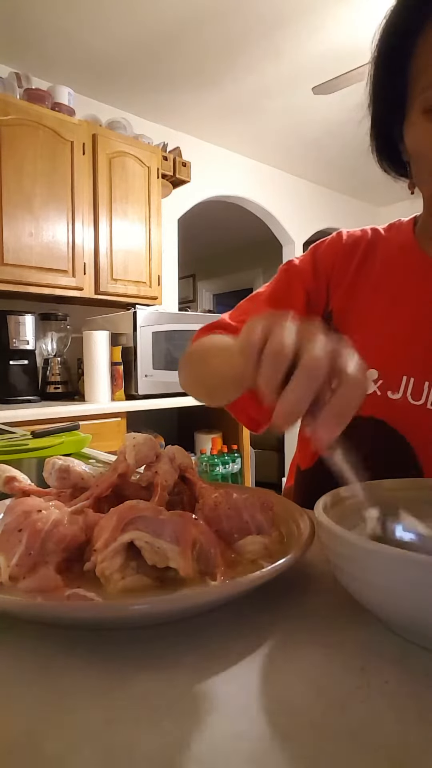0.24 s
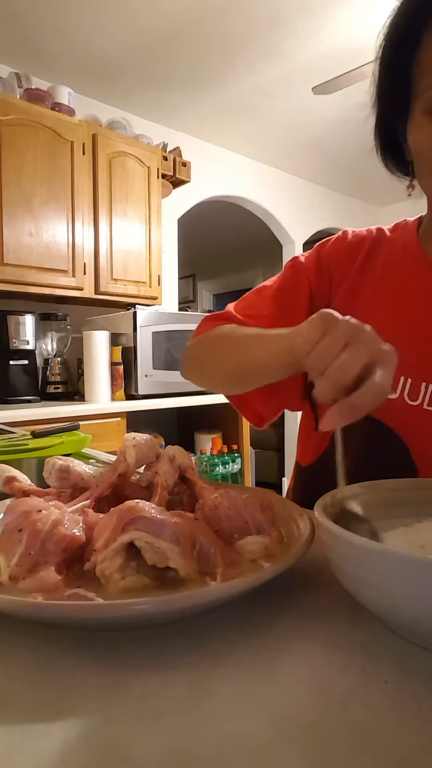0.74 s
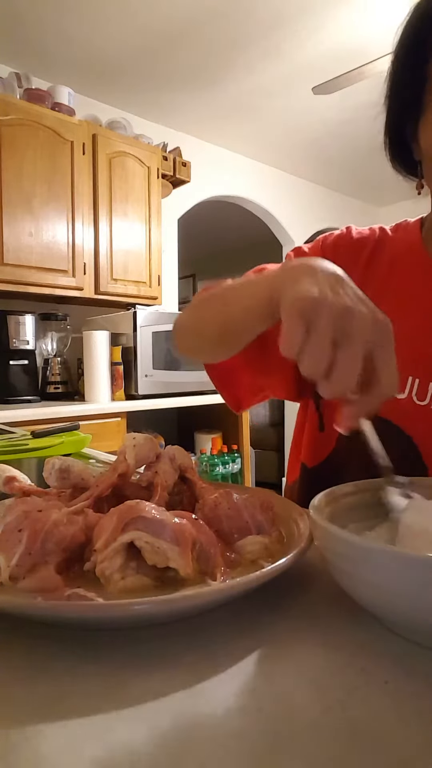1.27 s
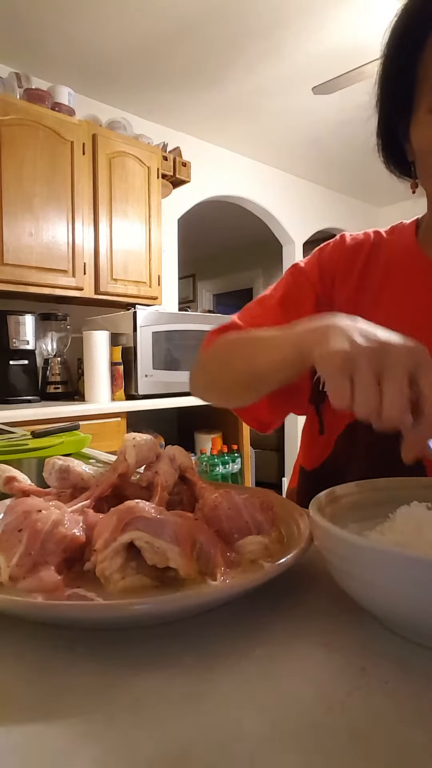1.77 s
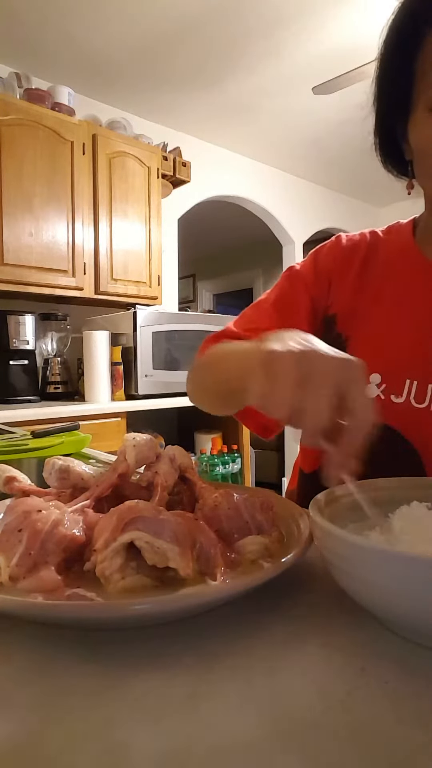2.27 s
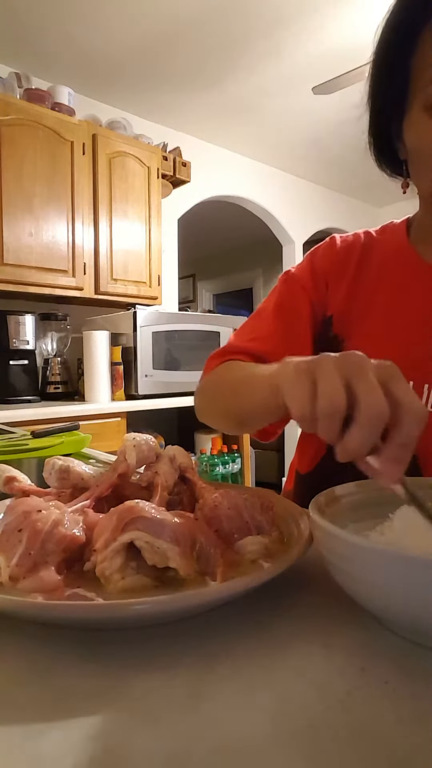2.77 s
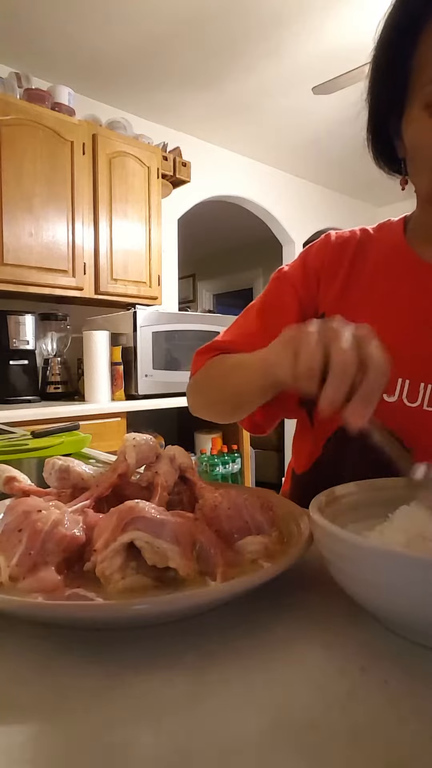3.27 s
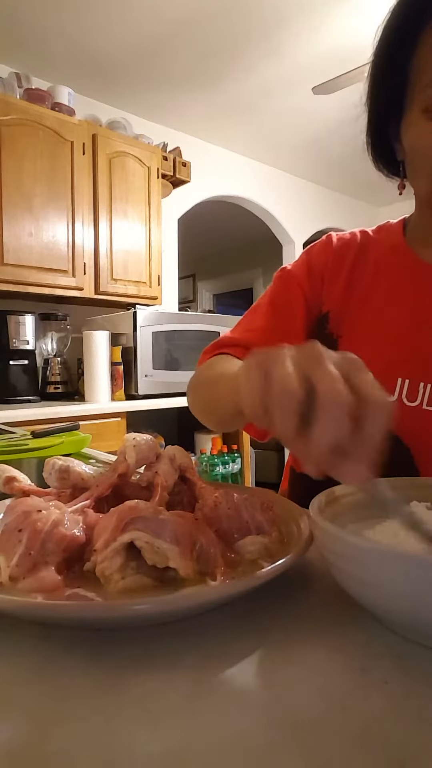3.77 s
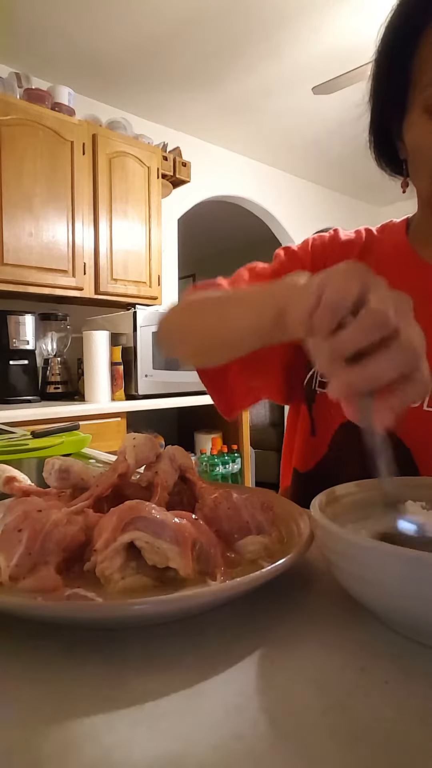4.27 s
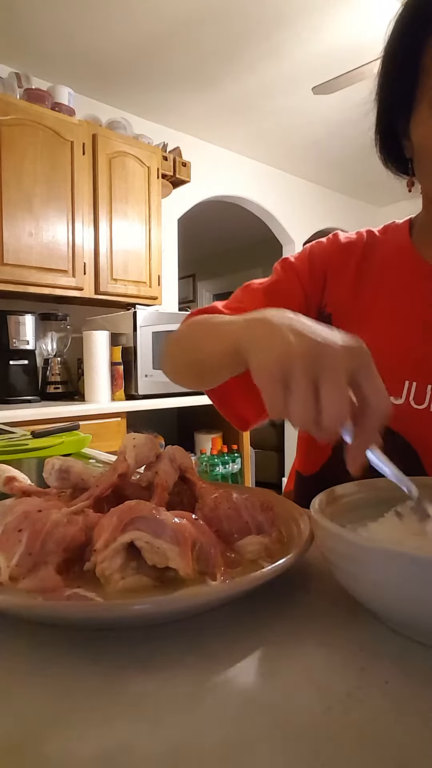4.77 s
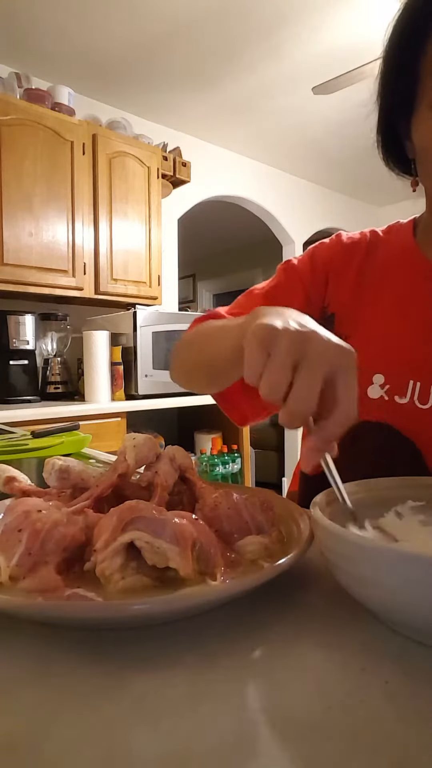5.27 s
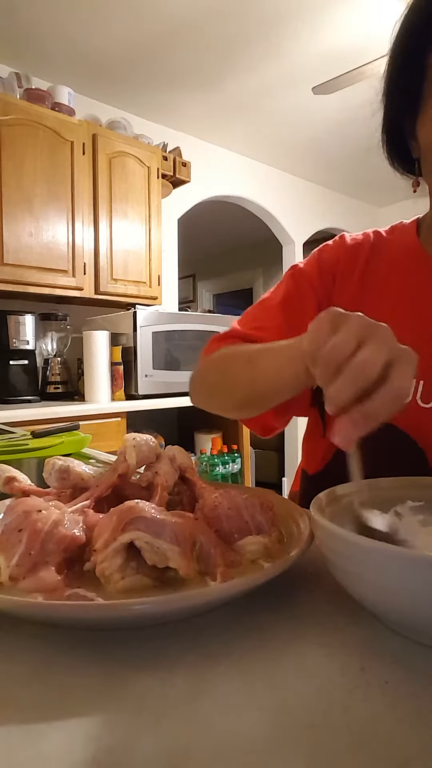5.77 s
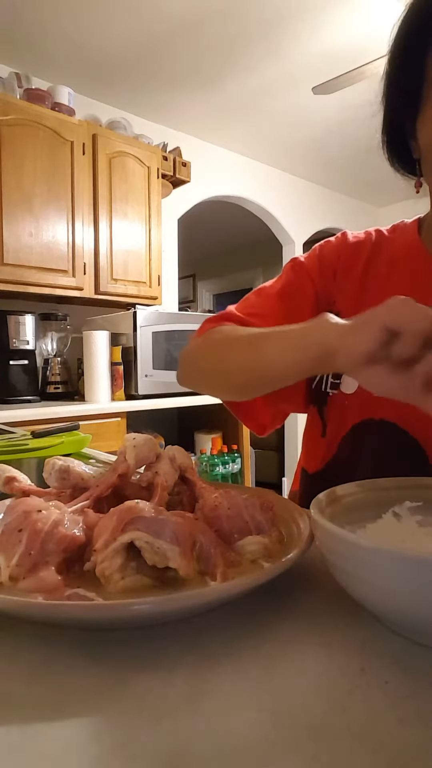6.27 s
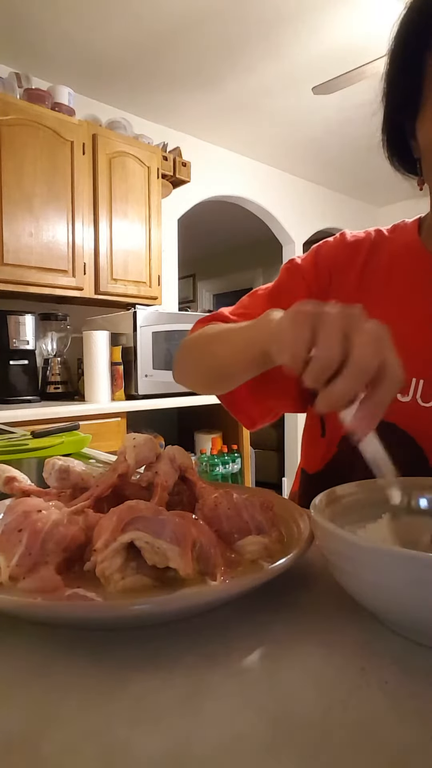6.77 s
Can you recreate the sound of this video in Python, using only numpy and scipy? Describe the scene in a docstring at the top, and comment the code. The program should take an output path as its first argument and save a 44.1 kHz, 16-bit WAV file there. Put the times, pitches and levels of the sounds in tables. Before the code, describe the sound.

A metal spoon stirs dry powder in a ceramic bowl, scraping softly in uneven sweeps with short dull clinks in a quiet kitchen.

```python
"""On a kitchen counter, just right of a stereo microphone pair, a metal spoon stirs dry coating mix in a bowl.
A stroke is band-split friction noise: rumble, scrape and grit, coloured by resonances of spoon and bowl.
Knocks through the powder are damped sines with a noise burst and a faint, brief ring of the ceramic wall;
clinks ring it more. Slips make the wall skid and creak. The packed bowl rings only briefly.
A small kitchen answers with noise echoes, over moving air and a faint appliance hum.
"""
import sys
import numpy as np
from scipy import signal
from scipy.fft import rfft, irfft, next_fast_len
from scipy.io import wavfile
from scipy.ndimage import uniform_filter1d, map_coordinates

SR = 44100
rng = np.random.default_rng(int(sys.argv[2]) if len(sys.argv) > 2 else 0)


def generate_wav(signal):
    """Clip the signal to [-1, 1] and save it as 16-bit WAV at the path in sys.argv[1]."""
    frames = np.transpose(np.atleast_2d(signal))
    scaled = np.clip(frames, -1, 1) * 32767
    pcm = np.round(scaled).astype(np.int16)
    wavfile.write(sys.argv[1], SR, pcm)


N = 310464

# Room tone of moving air. Each row: frequency in Hz, relative level in dB.
AIR = [(20, -38.5), (58, -3), (85, -9), (150, -0.5), (320, -7), (600, -15.5), (3000, -30), (16000, -52)]
# Likeness of the two channels of the air. Each row: frequency in Hz, left-right likeness from 0 to 1.
AIR_ALIKE = [(240, 0.986), (3500, 0)]
HUM_HZ, HUM_DB = 240.5, -57  # the appliance hum; its level wavers about this value
# Decay of the room. Each row: frequency in Hz, t60 in seconds.
KITCHEN_T60 = [(2000, 0.4), (14000, 0.023)]

# Direction of the bowl. Each row: frequency in Hz, left-right difference in dB (positive is left).
BALANCE = [(200, -2), (660, -11), (880, -5.5), (2600, -3), (3600, -9), (12000, -1)]
# Likeness of the two channels of a near noise. Each row: frequency in Hz, left-right likeness from 0 to 1.
NEAR_ALIKE = [(300, 1), (6000, 0.54)]
# The nearer microphone leads. Each row: frequency in Hz, phase in radians by which left lags.
LAG = [(220, 0), (500, 0.984), (1600, 0.88), (2400, 1)]

# Packed powder creaks under the spoon.
# Each row: centre in seconds, half length in seconds, mean pitch in Hz, level in dB.
CREAKS = [(0.016, 0.0336, 2659, -40), (0.856, 0.0412, 1154, -33.5), (0.88, 0.0127, 1424, -34),
          (1.413, 0.0165, 440, -35), (2.798, 0.0324, 2620, -40), (4.395, 0.0985, 440, -42)]
# The spoon's edge chatters on bare glaze.
# Each row: centre in seconds, half length in seconds, frequency driven most in Hz, drive in dB.
SKIDS = [(0.058, 0.0291, 5730, -39), (0.83, 0.0102, 3225, -37.5), (1.257, 0.0164, 5650, -24.5),
         (1.294, 0.00953, 2980, -21.5), (1.297, 0.0054, 8540, -19), (3.978, 0.0044, 3225, -38.5),
         (4.23, 0.00277, 8260, -19), (4.55, 0.0094, 6100, -23.5)]

# Wall modes of the bowl.
# Each row: frequency in Hz, relative level in dB, free t60 in seconds, left-right difference in dB.
WALL_MODES = [(1316, 1, .155, -6), (3225, 0, .19, -8), (5652, -5.5, .135, -10), (8538, -5.5, .125, -6),
              (10760, -13, .08, 0), (11836, -5.5, .13, 1), (12778, -7, .12, 4), (15475, -10, .12, 1)]
# The whole bowl rocking on the counter.
# Each row: mean frequency in Hz, relative level in dB, free t60 in seconds.
ROCKING_MODES = [(446.1, -9, 0.1292), (597.5, -8.5, 0.044), (281.3, -19.5, 0.234)]
# The spoon strikes bare wall. Each row: start in seconds, thump in Hz, knock in dB, low ring in dB,
# high ring in dB, treble in dB, lengths of the low and of the high ring as shares of the free ring.
# All levels are relative.
CLINKS = [(0.3446, 484.3, -9.5, -19, -22.5, -20.5, 1.454, 1.622),
          (0.38, 427, -10.5, -31.5, -24.5, -57.5, 0.644, 0.5),
          (0.719, 465.3, -4, -14, -20.5, -17, 0.581, 0.154),
          (1.119, 503, -13.5, -13.5, -18.5, -30.5, 1.207, 1.064),
          (1.194, 438, -29.5, -20, -33.5, -37, 0.864, 1.42),
          (2.179, 402, -16.5, -15.5, -14, -14, 1.5, 1.597),
          (3.09, 466.4, -8.5, -21.5, -21.5, -20, 1.36, 0.89),
          (3.157, 436.2, -12.5, -25.5, -34, -55.5, 0.69, 0.8),
          (3.494, 558, -9.5, -19, -22.5, -38.5, 0.278, 1.27),
          (4.2166, 426.3, -10.5, -13.5, -25, -31.5, 1.014, 1.64),
          (5.7614, 454.4, -11.5, -17.5, -24, -22.5, 0.565, 0.595),
          (7.025, 407, -11.5, -15.5, -27.5, -23, 1.75, 1.67)]
# Duller blows through a cushion of powder: the wall rings only briefly and faintly.
# Each row: start in seconds, thump in Hz, then knock, burst and treble in relative dB.
THUDS = [(0.114, 553, -17.5, -25.5, -72.5), (1.4333, 408, -29, -21, -40), (1.831, 322, -27.5, -30.5, -48),
         (1.94, 464, -23.5, -22.5, -56), (2.227, 586, -16, -13, -23.5), (2.248, 465, -19, -17.5, -38.5),
         (2.728, 410, -17.5, -46, -57.5), (2.8926, 430.6, -20, -18, -65), (3.819, 427, -6, -18, -49.5),
         (4.025, 586, -25.5, -37, -59.5), (4.776, 693, -39, -18, -48), (5.066, 444, -26.5, -42.5, -46.5),
         (6.317, 494.6, -27, -27.5, -43.5), (6.637, 418, -7.5, -14, -36.5)]
THUD_LENGTH, THUD_RING_DB = 0.418, -18.5  # share of the free ring; lowest wall mode relative to the burst
# Dull burst of a blow. Each row: frequency in Hz, relative level in dB.
BURST_COLOUR = [(100, -23.5), (300, 5.5), (700, 10), (1500, 10), (2300, -6), (16000, -43)]
# Steel on glaze. Each row: frequency in Hz, relative level in dB.
TICK_COLOUR = [(1000, -7), (4200, 5), (9500, -1), (10800, 3.5), (14000, -5), (16000, -0.5)]
SNAP_S, SNAP_DB = 0.0001653, 3.5  # the contact itself: one short push and pull, relative to the burst
THUMP_DB, THUMP_T60 = 6, 0.0234  # the main thump: relative level, free t60 in s
# The spoon rattles on the wall and feeds the ring before it settles: time and dB scales.
# The swell peaks at about 0.8 of the time and 0.7 of the dB.
CHATTER_S, CHATTER_DB = 0.02, 4.5
# The spoon falls back on the wall and chokes the ring. Each row: start in seconds, gain in dB.
CHOKES = [(2.196, -7)]

# Sweeps through the mix. Each row: landing in seconds, length in seconds, then rumble, scrape and grit
# in dB before push and easing, centre of the push as a share of the length, push in dB (negative dips).
STROKES = [(0, 0.0979, -42, -47.5, -49, 0, 7.5), (0.343, 0.1486, -59, -46.5, -50.5, 0, -1.5),
           (0.713, 0.1915, -43.5, -46, -48.5, 0.78, 2), (1.018, 0.114, -46, -51.5, -66.5, 0.68, 10),
           (1.118, 0.3856, -45, -50.5, -51.5, 0.44, 7), (1.829, 0.103, -50, -45, -52, 0.2, 6.5),
           (2.175, 0.2742, -55.5, -46.5, -57.5, 0.56, 8.5), (2.728, 0.1811, -43.5, -47, -50.5, 0.69, 4),
           (3.09, 0.1876, -45, -48.5, -51.5, 0, -4), (3.491, 0.0897, -39, -44, -54.5, 0.09, 5),
           (3.821, 0.188, -49.5, -48, -55, 0.63, 14), (4.218, 0.5545, -49.5, -47.5, -52, 0.62, 11),
           (5.061, 0.4802, -57.5, -53.5, -59.5, 0.71, 12), (5.786, 0.289, -43.5, -53.5, -60.5, 0.63, 11.5),
           (6.31, 0.1148, -43, -54, -60.5, 0, 7), (6.633, 0.2, -48, -53, -55, 0.75, 8)]
PUSH_S, PUSH_SHARE = 0.019, 0.142  # half length of the push in s, plus a share of the sweep's length
# How far each band follows the push: shares for rumble, scrape and grit.
PUSH_GROWS = [0.51, 1, 0.8]
EASE_DB = 2.5  # fall of the drag from landing to lift
BITE_S, SETTLE_S = 0.0022, 0.005  # the spoon bites at once; the powder settles after it lifts
# The spoon catches on a lump and breaks it. Each row: start in seconds, level in dB.
CATCHES = [(0.824, -41.5), (2.32, -41), (4.522, -35), (4.564, -34)]
CATCH_S = 0.012  # time constant by which a catch dies
# Balance of a catch: rumble, scrape and grit in relative dB.
CATCH_DB = [-17.5, 1.5, -5.5]
# Hiss of the powder. Each row: frequency in Hz, relative level in dB.
POWDER = [(60, -10.5), (240, 3.5), (780, 1.5), (1250, -3.5), (2050, -13.5), (7000, -19.5), (9600, -22.5),
          (11000, -15), (16000, -21.5)]
# Resonances of spoon and bowl while they rub. Each row: frequency in Hz, width in Hz, relative level in dB.
RUB_RESONANCES = [(435.15, 70, 10), (1081.3, 150, 13), (1615.2, 360, 13), (2652.5, 434, 17.5),
                  (3325, 200, 16), (4436, 640, 10), (5672, 460, 10), (8297, 1100, 8)]
DRIFT, DRIFT_PER_S = 0.012, 35  # the contact travels: share of pitch, random knots a second

TOP_HZ = 15900  # band limit


def amp(db):
    """Logarithmic level: decibels become a gain."""
    return np.exp(np.asarray(db) * (np.log(10) / 20))


def unit(x):
    """Normalization of power: scale to rms 1."""
    return x / np.sqrt(np.mean(x ** 2) + 1e-20)


def along(points, hz):
    """Interpolation on a logarithmic frequency axis through (Hz, value) points."""
    f, v = np.transpose(points)
    return np.interp(np.log(hz + 1), np.log(f + 1), v)


def wobble(rate, size=N):
    """Band-limited random modulation: a smooth curve through normal draws, rate knots a second."""
    knots = rng.standard_normal(int(size * rate / SR) + 4)
    return map_coordinates(knots, [np.arange(size) * rate / SR])


def swell(s, half):
    """Gaussian envelope: a bell-shaped gain around time s."""
    return np.exp(-((np.arange(N) / SR - s) / half) ** 2)


def filtered(x, response):
    """Linear filtering: the spectrum of x times a response of frequency."""
    size = x.shape[-1]
    m = next_fast_len(size + 8192)
    return irfft(rfft(x, m) * response(np.fft.rfftfreq(m, 1 / SR)), m)[..., :size]


def pan(db):
    """Level difference between channels: left and right gains whose mean is 1."""
    g = amp(np.array([[.5], [-.5]]) * db)
    return g / g.mean(0)


def placed(pair, colour, alike=NEAR_ALIKE, balance=BALANCE):
    """Interchannel coherence: two unrelated noises become a coloured stereo sound with a mid of rms 1."""
    m = next_fast_len(N)
    hz = np.fft.rfftfreq(m, 1 / SR)
    turn = np.arccos(np.clip(along(alike, hz), -1, 1)) / 2
    mid, side = rfft(pair, m) * colour(hz) * np.array([np.cos(turn), np.sin(turn)])
    stereo = np.array([mid + side, mid - side]) * pan(along(balance, hz))
    return irfft(stereo, m)[:, :N] / irfft(mid, m).std()


def add(track, s, sound):
    """Superposition: mix a sound in at time s."""
    part = track[:, round(s * SR):][:, :sound.shape[1]]
    part += sound[:, :part.shape[1]]


def room_tone(air_db=-53):
    """Broadband and tonal background: coloured noise of moving air and a slightly unsteady appliance hum."""
    air = placed(rng.standard_normal((2, N)), lambda hz: amp(along(AIR, hz)), AIR_ALIKE,
                 [(100, 0.5), (1000, -2)])  # direction: Hz, left-right dB
    phase = 2 * np.pi * HUM_HZ * np.arange(N) / SR + .5 * wobble(20.0)
    hum = amp(HUM_DB + 4.16 * wobble(3.69)) * np.sin(phase)
    return amp(air_db) * air + hum


def kitchen(x, early_db=-13, early_t60=0.291, tail_db=-21):
    """Reverberation: sparse reflections from counter and cupboards, and a faint diffuse room tail."""
    hz, t, z = signal.stft(rng.standard_normal((2, SR // 2)), SR, nperseg=256)
    decay = amp(-60 * t / along(KITCHEN_T60, hz)[:, None])
    tail = signal.istft(z * decay, SR, nperseg=256)[1]
    reflections = rng.standard_normal(tail.shape) * (rng.random(tail.shape) < .03)
    early = reflections * amp(-60 * np.arange(tail.shape[1]) / SR / early_t60)
    answer = amp(tail_db) * tail / np.linalg.norm(tail[0]) + amp(early_db) * early / np.linalg.norm(early[0])
    delayed = np.pad(answer, ((0, 0), (130, 0)))  # samples, about 3 ms
    return signal.fftconvolve(x, delayed, axes=1)[:, :N]


def creaks(slips_per_s=190, ring_s=0.0085, wander_hz=55):
    """Stick-slip: uneven slips ring one resonance of spoon or bowl, whose pitch wanders with pressure."""
    out = np.zeros(N)
    for s, half, hz, db in CREAKS:
        slip_rate = slips_per_s * np.exp(.5 * wobble(slips_per_s))
        slips = np.diff(np.floor(np.cumsum(slip_rate) / SR), prepend=0)
        kicks = slips * np.exp(2j * np.pi * rng.random(N))
        ring = signal.lfilter([1], [1, -np.exp(-1 / (ring_s * SR))], kicks)
        turns = np.cumsum(hz + wander_hz * wobble(60)) / SR
        out += amp(db) * swell(s, half) * unit(np.real(ring * np.exp(2j * np.pi * turns)))
    return filtered(out, lambda hz: pan(along(BALANCE, hz)))


def skids(below_db_per_octave=6, above_db_per_octave=17):
    """Forced resonance: irregular slips drive the wall modes, most those near the slips' own pitch."""
    slips, out = rng.standard_normal(N), np.zeros((2, N))
    drives = [(swell(s, half), pitch, db) for s, half, pitch, db in SKIDS]
    loss_db = lambda octaves: max(-below_db_per_octave * octaves, above_db_per_octave * octaves)
    for hz, mode_db, t60, side_db in WALL_MODES:
        width_hz = np.log(1000) / (np.pi * t60)  # bandwidth that belongs to the decay
        drive = sum(shape * amp(db - loss_db(np.log2(hz / pitch))) for shape, pitch, db in drives)
        singing = signal.lfilter(*signal.iirpeak(hz, hz / width_hz, fs=SR), slips * drive)
        # narrow modes pass less noise power
        out += amp(mode_db) * pan(side_db) * singing * np.sqrt(SR / (3 * np.pi * width_hz))
    return out


def blows():
    """Common form of impacts: clinks and thuds as start, thump Hz, knock, burst, low ring, high ring
    and treble in dB, low and high ring length."""
    clinks = [(s, hz, knock, (knock + low) / 2, low, *rest) for s, hz, knock, low, *rest in CLINKS]
    thuds = [(s, hz, knock, burst, burst + THUD_RING_DB, treble, treble, THUD_LENGTH, THUD_LENGTH)
             for s, hz, knock, burst, treble in THUDS]
    return clinks + thuds


def wall_ring(t, levels_db, lengths, split=.017, twin_db=-7, twin_life=.55, attack=.0007, scatter_db=1,
              after_db=-25, flutter_db=1.5):
    """Mode splitting: in a bowl not quite round each mode has a twin, usually higher, and the two beat."""
    out = np.zeros((2, len(t)))
    chatter = amp(CHATTER_DB * (t / CHATTER_S) / (1 + (t / CHATTER_S) ** 10))
    for (hz, db, t60, side_db), level_db, length in zip(WALL_MODES, levels_db, lengths):
        size, detune, side = rng.standard_normal(3)
        # short waves reach the two microphones out of step
        step = np.array([[.5], [-.5]]) * np.sign(side) * min(hz / 4500, 1.8)
        phase = rng.uniform(0, 2 * np.pi) + step
        fall_db = -60 * t / (t60 * max(length, .05))
        # a faint after-ring outlasts the first quick decay
        main = (amp(fall_db) + amp(after_db + fall_db / 2)) * np.sin(2 * np.pi * hz * t + phase)
        twin_hz = hz * (1 + split * (1 + detune / 2) * np.sqrt(WALL_MODES[0][0] / hz))
        twin = amp(twin_db + fall_db / twin_life) * np.sin(2 * np.pi * twin_hz * t + phase[::-1])
        # the sliding spoon roughens the ring, the higher modes most
        flutter = amp(flutter_db * np.sqrt(hz / WALL_MODES[1][0]) * wobble(110, size=len(t)))
        out += amp(db + level_db + scatter_db * size) * pan(side_db) * (main + twin) * flutter
    return out * chatter * (1 - np.exp(-t / attack))


def choked(s, t):
    """Contact damping: gain of a ring struck at time s, as the spoon falls back on it within 2 ms."""
    return amp(sum(db * np.clip((s + t - at) / .002, 0, 1) for at, db in CHOKES if at > s))


def strikes(knock_gain_db=-1, ring_gain_db=-3.5, burst_gain_db=-7, burst_t60=0.0535,
            tick_db=-4, tick_t60=0.0381, spill_db=-17, spill_t60=0.1, low_cut_hz=170):
    """Impact excitation: each blow rocks the bowl, rings its wall and throws a short burst of powder."""
    out, t = np.zeros((2, N)), np.arange(int(.4 * SR)) / SR
    bursts = placed(rng.standard_normal((2, N)), lambda hz: amp(along(BURST_COLOUR, hz)))
    ticks = placed(rng.standard_normal((2, N)), lambda hz: amp(along(TICK_COLOUR, hz)))
    rise = 1 - np.exp(-(t / 0.0009826) ** 2)
    u = (t - t[np.argmax(rise > .5)]).clip(0) / SNAP_S
    snap_pan = pan(along(BALANCE, 1 / (2 * np.pi * SNAP_S)))
    snap = amp(SNAP_DB) * snap_pan * u * (2 - u) * np.exp(-u)
    hardest_db = max(treble for *_, treble, _, _ in CLINKS)
    for s, thump_hz, knock_db, burst_db, low_db, high_db, treble_db, length, high_length in blows():
        # a spoon that stays pressed on the wall damps it
        held = np.clip(length, .05, 1.5) ** .6
        rocking = [(thump_hz, THUMP_DB, THUMP_T60 * held)]
        rocking += [(hz * rng.normal(1, 0.034), db, t60 * max(length, .05)) for hz, db, t60 in ROCKING_MODES]
        knock = sum(amp(db - 60 * t / t60) * -np.sin(2 * np.pi * hz * t) for hz, db, t60 in rocking)
        start = rng.integers(N - len(t))
        # the less the wall may ring, the more of the blow goes into a short dry burst
        burst_decay = amp(burst_gain_db - 60 * t / (burst_t60 * held)) / np.sqrt(held)
        burst = bursts[:, start:][:, :len(t)] * burst_decay
        tick_decay = amp(tick_db - 60 * t / tick_t60) + amp(spill_db - 60 * t / spill_t60)
        tick = ticks[:, start:][:, :len(t)] * tick_decay
        blow = amp(knock_db + knock_gain_db) * pan(-8.0) * knock + amp(burst_db) * burst + amp(treble_db) * tick
        # only the hardest blows reach the top four modes in full
        top_db = 2 * treble_db - hardest_db
        levels_db = [low_db, high_db] + [treble_db] * 2 + [top_db] * 4
        lengths = [length] + [high_length] * (len(WALL_MODES) - 1)
        ring = wall_ring(t[t < t[-1] * max(length, high_length)], levels_db, lengths)
        add(out, s, rise * blow + amp(burst_db) * snap)
        add(out, s, amp(ring_gain_db) * ring * choked(s, t[:ring.shape[1]]))
    # the blows carry little deep bass
    return signal.sosfilt(signal.butter(2, low_cut_hz, 'high', fs=SR, output='sos'), out)


def drag():
    """Load-dependent friction: rumble, scrape and grit gains of sweeps that bite, swell or dip once
    around one place in their length, ease and lift; lumps jolt them."""
    out, t = np.zeros((3, N)), np.arange(int(.8 * SR)) / SR
    for s, length, rumble_db, scrape_db, grit_db, place, push_db in STROKES:
        push = push_db * np.exp(-((t - place * length) / (PUSH_S + PUSH_SHARE * length)) ** 2)
        ease = EASE_DB * (t / length - .5)
        level_db = np.c_[[rumble_db, scrape_db, grit_db]] + np.outer(PUSH_GROWS, push) - ease
        touch = (1 - np.exp(-t / BITE_S)) * np.exp(-(t - length).clip(0) / SETTLE_S)
        add(out, s, amp(level_db) * touch)
    for s, db in CATCHES:
        add(out, s, amp(db + np.c_[CATCH_DB]) * np.exp(-t / CATCH_S))
    return out


def rubbed_colour(hz):
    """Resonant filtering: the powder's hiss, lifted at the resonances of spoon and bowl."""
    lift = sum((amp(db) / (1 + (2 * (hz - c) / w) ** 2)) ** 2 for c, w, db in RUB_RESONANCES)
    return amp(along(POWDER, hz)) * np.sqrt(1 + lift)


def wandering(pair, depth_db, size):
    """Time-frequency modulation: long frames make narrow resonances come and go, short ones make clumps."""
    z = signal.stft(pair, nperseg=size)[2]
    smooth = lambda v: uniform_filter1d(uniform_filter1d(v, size=3, axis=-2), size=14, axis=-1)
    # one field shared by both channels, plus a part of their own
    field = smooth(smooth(rng.standard_normal(z.shape[1:]) + .5 * rng.standard_normal(z.shape)))
    return signal.istft(z * amp(depth_db * np.tanh(unit(field))), nperseg=size)[1][:, :N]


def drifting(pair):
    """Frequency modulation by a varying time base: the resonances within one band glide together."""
    place = np.cumsum(1 + DRIFT * wobble(DRIFT_PER_S))
    return np.array([map_coordinates(side, [place], mode='mirror') for side in pair])


def scrape(grains_per_s=1400, grain_share=0.38, grain_spread_db=3, low_hz=800, high_hz=3400):
    """Granular friction: grains crush under the spoon in clumps, and the noise is split into three bands."""
    rumble, body, grit = drag()
    grain_sizes = amp(grain_spread_db * rng.standard_normal(N))
    crushes = (rng.random(N) < grains_per_s / SR) * rng.standard_normal((2, N)) * grain_sizes
    hiss = rng.standard_normal((2, N))
    friction = np.sqrt(grain_share) * unit(crushes) + np.sqrt(1 - grain_share) * hiss
    friction = wandering(friction, depth_db=6, size=512)
    friction = wandering(friction, depth_db=3.5, size=48)
    friction = friction * amp(1.4 * wobble(130))  # the drag sticks and slips
    below = lambda hz, edge: 1 / np.sqrt(1 + (hz / edge) ** 10)
    above = lambda hz, edge: np.sqrt(1 - below(hz, edge) ** 2)

    def rubbing(band):
        """Amplitude modulation: one band of the coloured friction, with its own slower unsteadiness."""
        return amp(1.4 * wobble(40)) * placed(friction, lambda hz: band(hz) * rubbed_colour(hz))

    # the rumble keeps its pitch; scrape and grit each drift by their own curve
    return (rumble * rubbing(lambda hz: below(hz, low_hz))
            + body * drifting(rubbing(lambda hz: above(hz, low_hz) * below(hz, high_hz)))
            + grit * drifting(rubbing(lambda hz: above(hz, high_hz))))


def scene():
    """Superposition of direct sound, echo and background: the stirring in the quiet kitchen."""
    lag = lambda hz: np.exp(np.array([[-.5j], [.5j]]) * along(LAG, hz))
    stirring = filtered(strikes() + skids() + creaks() + scrape(), lag)
    return stirring + kitchen(stirring) + room_tone()


def record(dry):
    """Saturation and band limiting: the loudest peaks round off, then a steep low-pass follows."""
    rounded = dry / (1 + dry ** 8) ** (1 / 8)
    return filtered(rounded, lambda hz: 1 / np.sqrt(1 + (hz / TOP_HZ) ** 200))


dry = scene()
out = record(dry)
generate_wav(out)
```